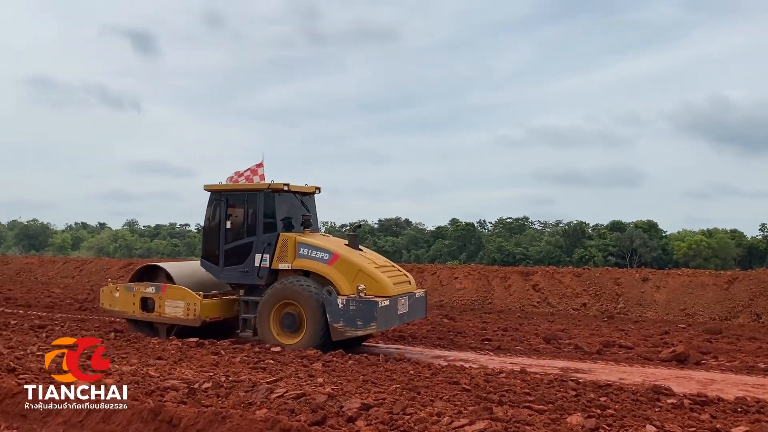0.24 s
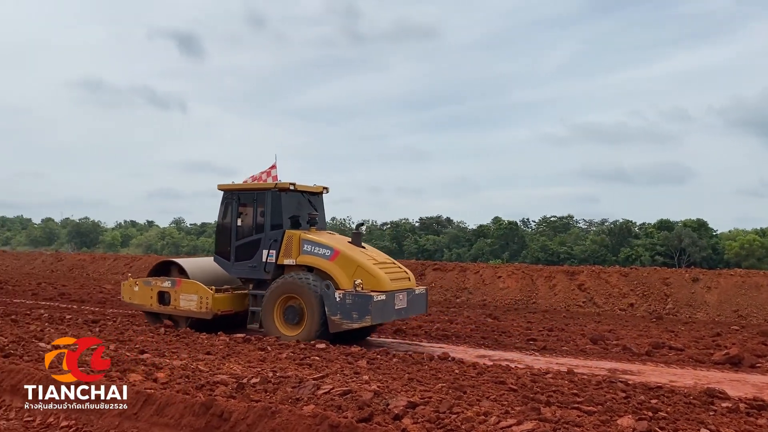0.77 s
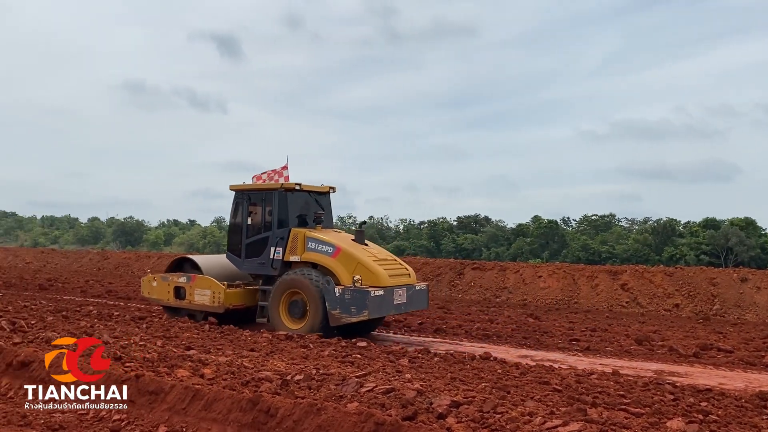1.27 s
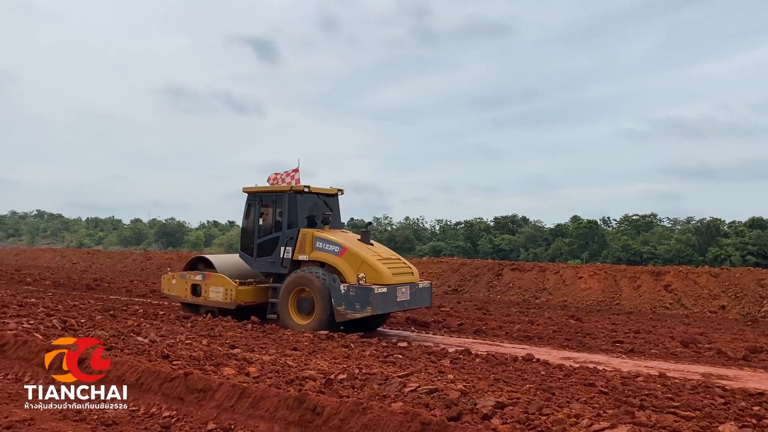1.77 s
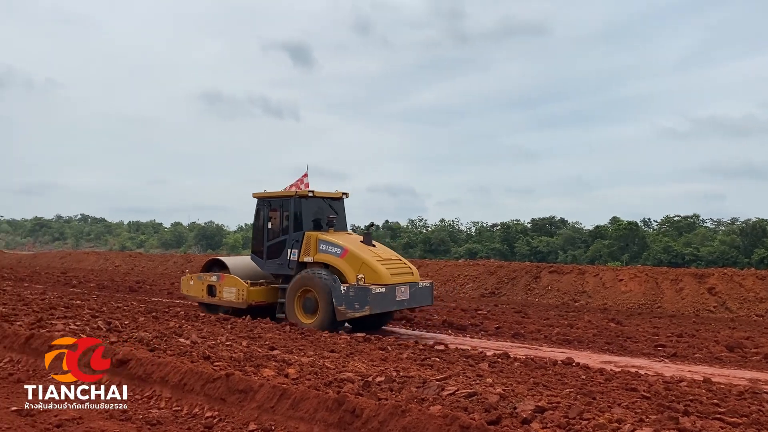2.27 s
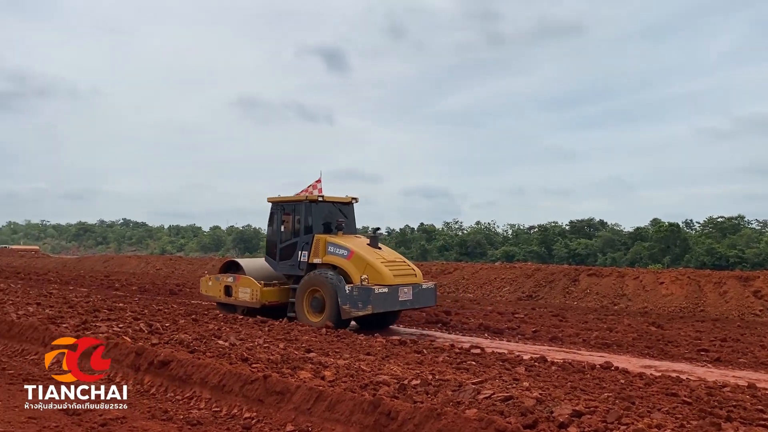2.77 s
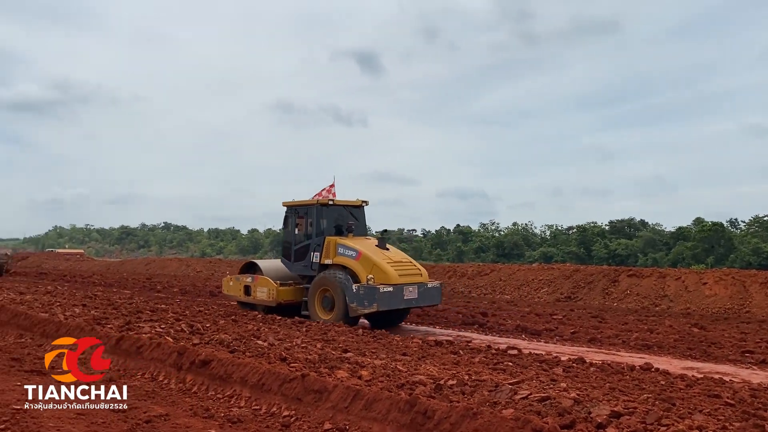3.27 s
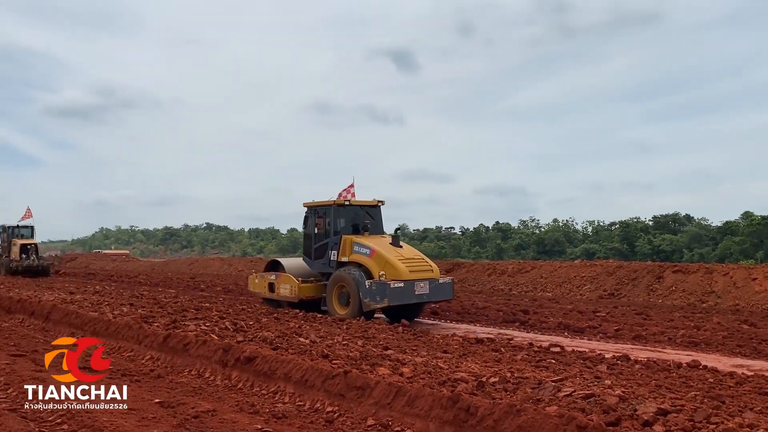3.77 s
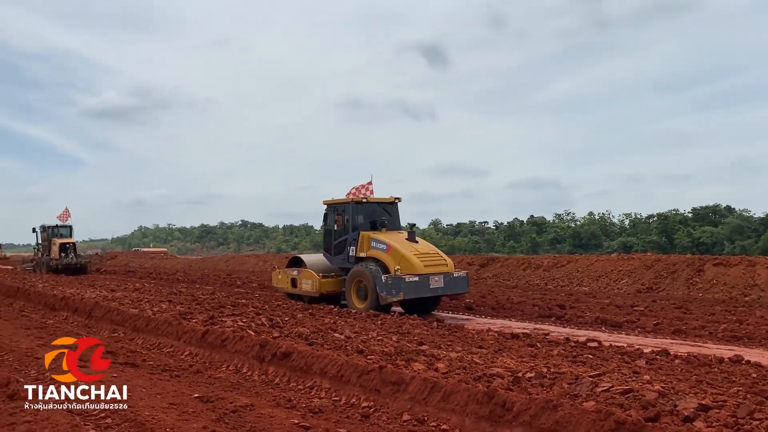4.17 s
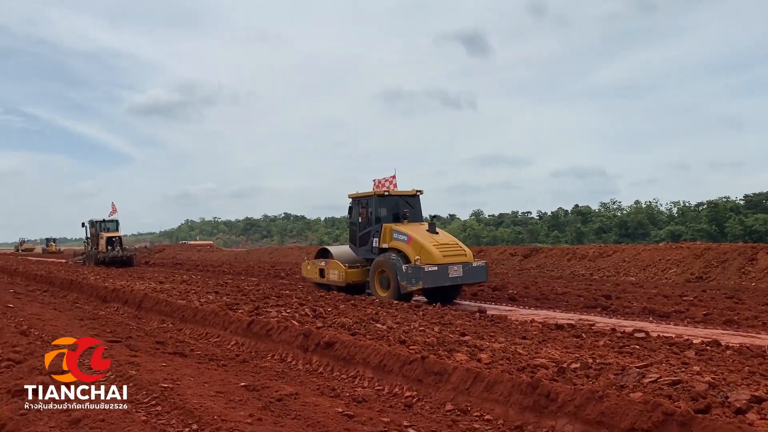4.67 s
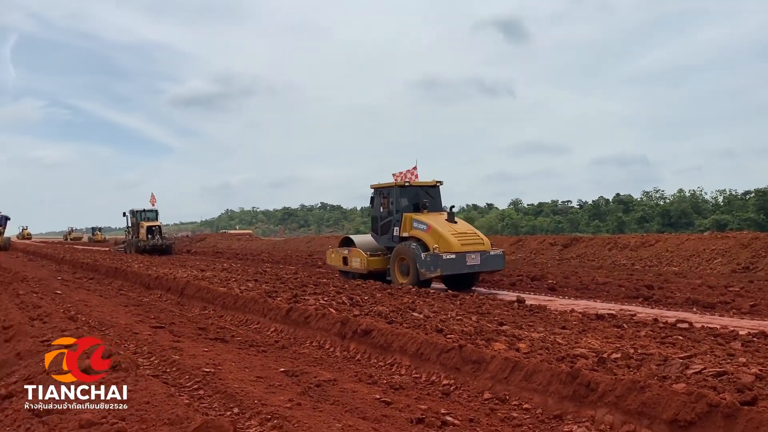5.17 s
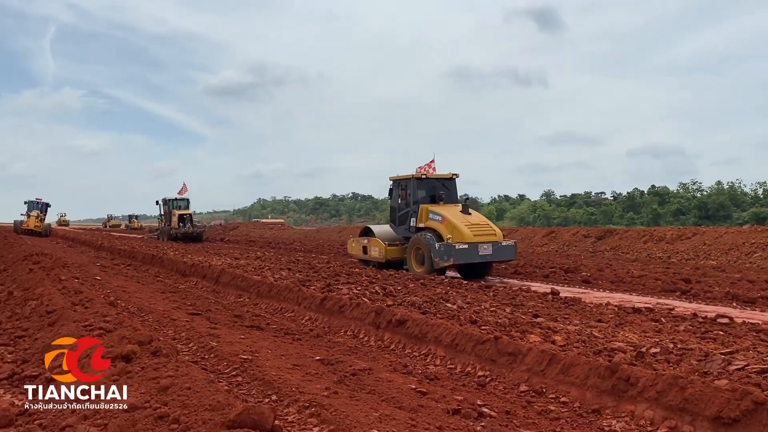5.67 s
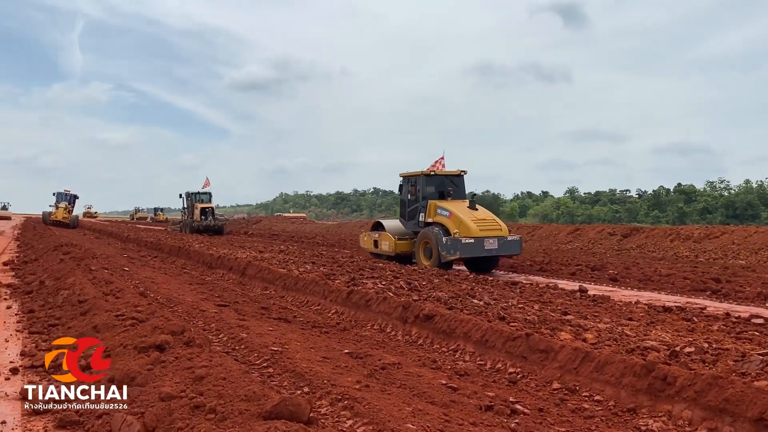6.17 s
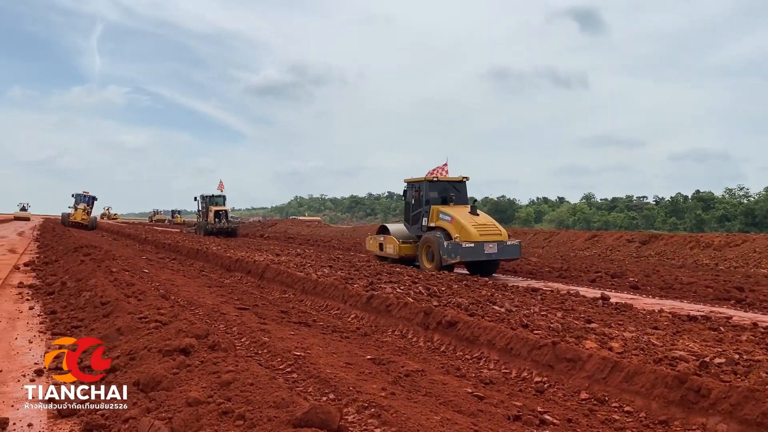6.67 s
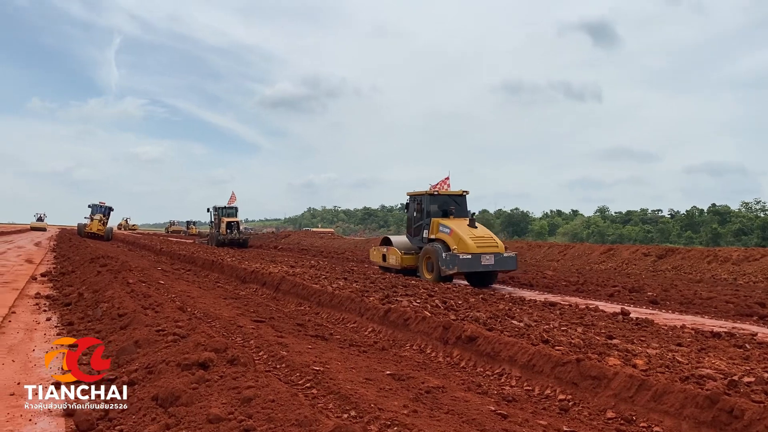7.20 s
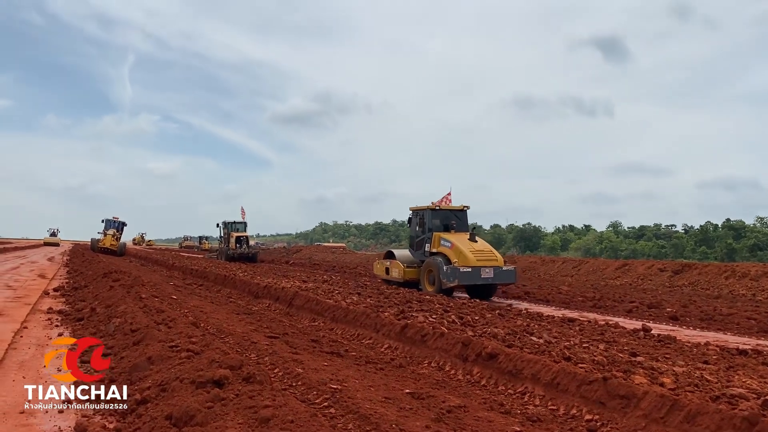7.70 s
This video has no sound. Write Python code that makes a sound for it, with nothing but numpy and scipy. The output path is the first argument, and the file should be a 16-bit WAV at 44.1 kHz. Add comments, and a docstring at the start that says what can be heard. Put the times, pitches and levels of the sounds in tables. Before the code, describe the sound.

A soil compactor works nearby on an open construction site, its diesel throbbing with fan roar, hiss, hydraulic whine and a deep vibrating drum. It slowly rolls away and the whine fades, while other engines drone farther off. A few brief clatters come early, then faint squeaks and a thin rattle of loose metal. Wind buffets the small stereo microphone throughout with low gusts and thumps.

```python
"""A soil compactor's diesel throbs about 14 m off, with fan roar, hydraulic whine and a vibrating drum.
It rolls away over loose fill while wind buffets the two ports of a small stereo microphone.
Farther across the site two engines drone and a second drum draws near. Brief clatters come through,
then the squeaks of a rubbing joint and the rattle of loose metal.
Sources that return a pair give (mid, side): what the ports share, and their difference."""
import sys
import numpy as np
from scipy import signal
from scipy.fft import rfft, irfft, next_fast_len
from scipy.io import wavfile
from scipy.ndimage import uniform_filter1d

SR = 44100
rng = np.random.default_rng(int(sys.argv[2]) if len(sys.argv) > 2 else 0)


def log_audio(samples):
    """Write samples as a 16-bit WAV file to the path given in sys.argv[1]."""
    # one column per channel
    frames = np.atleast_2d(samples).T
    # limit to full scale, then quantise
    limited = np.clip(frames, -1, 1)
    pcm = np.round(limited * 32767).astype(np.int16)
    wavfile.write(sys.argv[1], SR, pcm)


N = 350154
T = np.arange(N) / SR
FIRINGS_PER_S = 65.12
STAGES_S = [1.3, 4, 6.6]  # early, midway and late in the compactor's turn
START_M, SPEED_M_PER_S, ABEAM_S = 14.07, 3.38, 0.21  # its nearest distance, its pace, when it is nearest


def amp(db):
    return np.exp(np.asarray(db) * np.log(10) / 20)


def unit_rms(x):
    return x / np.sqrt(np.mean(abs(x) ** 2) + 1e-20)


def curves(rows):
    """Every column of a timed table at each sample."""
    times, *columns = np.transpose(rows)
    return [np.interp(T, times, column) for column in columns]


def at_hz(points, hz):
    """A table's value along a logarithmic frequency axis."""
    freqs, values = np.transpose(points)
    return np.interp(np.log(hz + 1), np.log(freqs + 1), values)


def drift(hz):
    """Random wander of rms 1, up to the rate hz."""
    lowpass = signal.butter(2, hz, fs=1000, output="sos")
    coarse = signal.sosfilt(lowpass, rng.standard_normal(10000))[1000:]
    return unit_rms(np.interp(T * 1000, np.arange(9000), coarse))


def tone(hz, db, multiple=1):
    """A sine that follows a pitch and an rms level."""
    turns = multiple * np.cumsum(hz * np.ones(N)) / SR + rng.random()
    return np.sqrt(2) * amp(db) * np.cos(2 * np.pi * (turns % 1).astype(np.float32))


def patchy_spectra(patchy_db, size=1024):
    """Random short-time spectra with louder and softer patches, and their frequencies."""
    real, imag, patches = rng.standard_normal((3, size // 2 + 1, N // (size // 4) + 5), dtype=np.float32)
    patches = unit_rms(uniform_filter1d(uniform_filter1d(patches, size=10, axis=0), size=12, axis=1))
    return (real + 1j * imag) * amp(patchy_db * patches), np.fft.rfftfreq(size, 1 / SR)


def coloured(spectra, hz, colour, later=None):
    """Noise of rms 1 from the spectra; its colour blends into the later one, if given."""
    size, blend = 2 * len(hz) - 2, np.linspace(0, 1, spectra.shape[1])
    colour_db = np.outer(at_hz(colour, hz), 1 - blend) + np.outer(at_hz(later or colour, hz), blend)
    return unit_rms(signal.istft(spectra * amp(colour_db), nperseg=size, noverlap=size * 3 // 4)[1][:N])


def resonate(x, hz, width_hz):
    """A resonance at a fixed or moving pitch: shift it to zero, smooth twice, shift back."""
    carrier = np.exp(2j * np.pi * np.cumsum(hz * np.ones(len(x))) / SR)
    pole = np.exp(-np.pi * width_hz / SR)
    smoothed = signal.lfilter([1], [1, -2 * pole, pole * pole], x * carrier.conj())
    return unit_rms((carrier * smoothed).real)


def distance():
    """The compactor's metres beyond its nearest point, and the spreading loss in dB."""
    gone_m = np.hypot(START_M, SPEED_M_PER_S * (T - ABEAM_S)) - START_M
    return gone_m, 20 * np.log10(1 + gone_m / START_M)


# Difference between the microphone's ports: (frequency [Hz], side re mid [dB])
LAG_LEVEL = [(30, -30), (60, -22), (120, -20), (330, -15), (430, -17.5), (560, -13), (800, -17.5),
             (1050, -20), (1300, -39), (1480, -42), (1700, -90)]
# Phase of that difference: (frequency [Hz], phase [turns])
LAG_PHASE = [(300, -0.26), (500, -0.23), (750, -0.2), (1100, -0.13)]
def port_lag(mid):
    """The side signal left by low sound reaching one port late."""
    size = next_fast_len(N)
    hz = np.fft.rfftfreq(size, 1 / SR)
    response = amp(at_hz(LAG_LEVEL, hz)) * np.exp(2j * np.pi * at_hz(LAG_PHASE, hz))
    return irfft(rfft(mid, size) * response, size)[:N]


# The firing note at the microphone, weaker at first: (time [s], level change [dB])
EXHAUST_TRIM = [(1, -2), (2.5, -2.5), (4.5, 1)]
# Overtones as the machine turns its back: (multiple, early level [dB], midway [dB], late [dB])
FIRING_ORDERS = [(2, -28, -31, -34), (3, -37, -37, -43), (7, -48, -40, -45), (8, -47, -55, -51),
                 (9, -46, -46, -49), (12, -52, -57, -51), (13, -45.5, -50, -65), (14, -58, -51, -52),
                 (18, -48, -48, -49), (20, -51, -48, -51), (20.5, -60, -52, -52), (23, -60, -52, -59),
                 (31.5, -52, -54, -66)]
def exhaust(level_db=-21.5):
    """The diesel's firings make a low note and a row of overtones."""
    out = tone(FIRINGS_PER_S, level_db + curves(EXHAUST_TRIM)[0] + 1.1 * drift(2.4))
    for multiple, *levels in FIRING_ORDERS:
        out += tone(FIRINGS_PER_S, np.interp(T, STAGES_S, levels) + 1.5 * drift(0.8), multiple)
    return out


# Fan roar with the machine side-on to the microphone: (frequency [Hz], relative density [dB])
ROAR_SIDE_ON = [(190, -63), (330, 5), (378, -14.5), (429, -1.5), (483, -5), (829, -4.5), (941, -9),
                (1430, -8.5), (1590, -9.5), (2200, -23.5), (2860, -56), (4840, -120)]
# The roar from behind, farther off: (frequency [Hz], relative density [dB])
ROAR_REAR = [(190, -9), (330, -6.5), (443, -1), (531, -8), (796, -7), (956, -5), (1300, -3.5), (1480, -13),
             (1690, -8.5), (2200, -13), (2860, -13), (4840, -120)]
# Pulsing within an engine cycle of four firings: (beats [per cycle], depth [0-1], phase [turns])
CYCLE_BEATS = [(1, .03, .1), (2, .045, -.3), (4, .05, .15), (5, .035, .1), (8, .02, .15)]
def fan_roar(nearest_db=-25.5):
    """Rushing air pulses with the unevenly firing cylinders and fades with distance."""
    _, loss_db = distance()
    cycles = FIRINGS_PER_S * T / 4
    pulse = 1 + sum(depth * np.cos(2 * np.pi * (k * cycles + phase)) for k, depth, phase in CYCLE_BEATS)
    roar = amp(nearest_db - loss_db) * pulse * coloured(*patchy_spectra(0.78), ROAR_SIDE_ON, ROAR_REAR)
    return roar, port_lag(roar)


# Engine hiss in the mid channel, machine side-on: (frequency [Hz], relative density [dB])
HISS_SIDE_ON = [(880, -27), (1500, -7.5), (1740, -6), (2170, -6), (2990, -4.5), (3830, -10.5),
                (4400, -10.5), (4890, -19.5), (5290, -15), (5820, -15), (7310, -19.5), (10900, -25.5),
                (11600, -29), (12300, -62), (12500, -100)]
# The hiss from behind, farther off: (frequency [Hz], relative density [dB])
HISS_REAR = [(880, -15.5), (1500, -1), (2170, -7.5), (3000, -10), (4300, -9.5), (4850, -16.5), (5300, -9),
             (5900, -13.5), (7500, -18), (10900, -22.5), (11600, -35.5), (12300, -54), (12500, -100)]
# The hiss in the difference of the ports: (frequency [Hz], relative density [dB])
HISS_WIDE = [(1500, -59), (1900, -89), (2120, -3), (2360, 2), (3000, 0), (3590, -7), (4070, -3), (4750, 2),
             (5380, -8.5), (6790, -7.5), (10400, -6.5), (12200, -11), (15800, -11)]
# How closely that difference is tied to the mid: (frequency [Hz], share [0-1])
HISS_COHERENCE = [(2000, .66), (3000, .75), (3900, .58), (4700, .36), (6500, 0.68), (9500, .68)]
def engine_hiss(mid_db=-30.5, side_db=-38.5, extra_loss_db_per_m=0.03):
    """Hiss swells at each firing, fades faster than the roar and reaches the ports a little apart."""
    gone_m, loss_db = distance()
    fade_db = -loss_db - extra_loss_db_per_m * gone_m
    side_fade_db = 0.62 * (fade_db - fade_db.mean())  # the side follows only part of the fading
    firing_phase = 2 * np.pi * FIRINGS_PER_S * T
    throb = amp(.5 * drift(12)) * (1 + .065 * np.cos(firing_phase) + .025 * np.cos(firing_phase / 4))
    spectra, hz = patchy_spectra(0.72)
    tied = at_hz(HISS_COHERENCE, hz)[:, None]
    # a delay between the ports turns the phase a quarter
    apart = 1j * tied * spectra + np.sqrt(1 - tied ** 2) * patchy_spectra(.9)[0]
    mid = amp(mid_db + fade_db) * coloured(spectra, hz, HISS_SIDE_ON, HISS_REAR)
    side = amp(side_db + side_fade_db) * coloured(apart, hz, HISS_WIDE)
    return throb * mid, throb * side


# Background of the whole site: (frequency [Hz], relative density [dB])
SITE_SPECTRUM = [(20, -23), (40, -1), (64, 8), (85, 4), (115, 0), (160, -9.5), (250, -13.5), (400, -19),
                 (600, -68)]
def site_rumble(level_db=-25.5):
    """A steady low rumble lies under the machines."""
    return amp(level_db) * coloured(*patchy_spectra(0.22, size=8192), SITE_SPECTRUM)


# The pump, which the bonnet hides from the microphone as the machine turns: (time [s], level [dB])
PUMP_LEVEL = [(0, -28.5), (1.3, -28), (2.6, -30), (3.3, -32), (3.8, -34.5), (4.6, -40), (5.3, -38),
              (6.6, -47), (7.94, -44)]
def pump(piston_hz=428.7):
    """The hydraulic pump's pistons whine, with a wavering octave above."""
    hz, db = piston_hz + 1.124 * drift(0.786), curves(PUMP_LEVEL)[0]
    whine = tone(hz, db + (.3 + 0.24 * T) * drift(1.0))
    octave = tone(2 * (hz + 4 * drift(8.97)), 0.62 * db - 32 + 3.5 * drift(2.7))
    return whine + octave, port_lag(whine + octave)


# The bonnet as it moves off: (frequency [Hz], width [Hz], early level [dB], midway [dB], late [dB])
PANEL_MODES = [(627, 19, -43, -52, -51), (715.3, 35, -37, -44, -45), (773, 80, -37, -45, -70),
               (850, 79, -39.5, -39.5, -47), (1312, 54, -56, -37.5, -46.5), (1640, 63, -43.5, -58, -69)]
def panels():
    """Bonnet panels sing, shaken by engine noise."""
    shaking, out = rng.standard_normal(N), np.zeros(N)
    for hz, width_hz, *levels in PANEL_MODES:
        mode = signal.iirpeak(hz, hz / width_hz, SR)
        ring = unit_rms(signal.lfilter(*mode, signal.lfilter(*mode, shaking)))
        out += amp(np.interp(T, STAGES_S, levels)) * ring
    return out, port_lag(out)


# The compactor's own drum, weaker over soft ground: (time [s], level [dB])
NEAR_DRUM_LEVEL = [(0, -18.5), (2.9, -21), (3.3, -22), (4.3, -21), (4.7, -20.5), (7.3, -24.5), (7.94, -27)]
# Its tones: (multiple of the shaft rate, level re the second multiple [dB])
NEAR_DRUM_ORDERS = [(1, -14), (2, 0)]
# A second drum drawing near from across the site: (time [s], level [dB])
FAR_DRUM_LEVEL = [(1.3, -34), (2.7, -24), (5.2, -21), (6.6, -21.5), (7.94, -26.5)]
# Its overtones: (multiple of the shaft rate, level re the second multiple [dB])
FAR_DRUM_ORDERS = [(2, 0), (3, -9)]
def drums(near_hz=26.1, far_hz=31.05):
    """Eccentric shafts shake the drums; the ground doubles the beat."""
    near_db, far_db = curves(NEAR_DRUM_LEVEL)[0], curves(FAR_DRUM_LEVEL)[0]
    near = sum(tone(near_hz, near_db + db + 1.3 * drift(7.1), k) for k, db in NEAR_DRUM_ORDERS)
    far = sum(tone(far_hz, far_db + db + drift(0.55), k) for k, db in FAR_DRUM_ORDERS)
    far_shaft = tone(far_hz, db=-31)
    return near + far + far_shaft


# Two engines far across the site, a list for each: (time [s], pitch [Hz], level [dB])
FAR_ENGINES = [
    [(0, 73.5, -23.5), (1.2, 74, -27), (3, 73, -24.5), (5, 73.7, -31), (7.94, 74, -25)],
    [(0, 97, -25), (1.5, 95.5, -28), (2.2, 96, -21), (3, 95.5, -23), (3.8, 90, -27), (4.2, 92, -32),
     (4.7, 97, -21), (6.5, 94, -35), (7.94, 94.5, -29)],
]
def drones(octave_db=-11.5):
    """Exhaust notes of far engines; pitch and level waver with the load."""
    out = np.zeros(N)
    for engine in FAR_ENGINES:
        hz, db = curves(engine)
        hz, db = hz + 0.618 * drift(2.43), db + 3.0 * drift(2.6)
        out += tone(hz, db) + tone(2 * hz, db + octave_db)
    return out


# Wind right at the microphone: (time [s], mid level [dB], side level [dB])
WIND_LEVELS = [(0, -34.5, -31), (.36, -18.5, -38), (.7, -28, -34), (1.05, -17.5, -43), (1.55, -21, -37),
               (1.85, -16.5, -37), (2.2, -23, -32), (2.64, -17.5, -33), (3.1, -18, -34), (3.45, -20.5, -34),
               (3.72, -22.5, -31), (4.1, -16, -36), (4.56, -21.5, -34), (4.7, -24.5, -40), (5, -28, -37),
               (5.28, -24, -56), (5.5, -25, -57), (5.78, -24.5, -42), (5.98, -24, -48), (6.6, -24, -33),
               (6.8, -21.5, -33), (7.2, -26.5, -35), (7.32, -22.5, -33), (7.5, -27, -35), (7.68, -17, -38),
               (7.8, -23.5, -39), (7.94, -23, -36)]
# Gusts on both ports alike: (frequency [Hz], relative density [dB])
GUST_SPECTRUM = [(20, -28), (38, -11), (50, -5), (81, 2.5), (180, -7.5), (394, -21), (546, -26), (867, -37),
                 (1500, -93)]
# Eddies that differ between the ports: (frequency [Hz], relative density [dB])
EDDY_SPECTRUM = [(20, -28), (45, 0), (80, 10), (200, -0.5), (424, -10), (826, -19.5), (1300, -50),
                 (1520, -67), (1700, -80)]
def wind():
    """Air buffets the ports with lumpy low noise."""
    gust_db, eddy_db = curves(WIND_LEVELS)
    gusts = coloured(*patchy_spectra(0.6, size=4096), GUST_SPECTRUM) * amp(gust_db + 3.0 * drift(22))
    eddies = coloured(*patchy_spectra(0.67, size=4096), EDDY_SPECTRUM) * amp(eddy_db + 3.0 * drift(26))
    return gusts, eddies + port_lag(gusts)


# Flurries across the microphone: (start [s], length [s], level [dB])
FLURRY_EVENTS = [(0.025, 0.15, -30.5), (5.63, 0.04, -33), (5.694, 0.028, -31), (5.765, 0.09, -26),
                 (7.137, 0.027, -27), (7.263, .015, -29), (7.28, 0.049, -23), (7.33, 0.076, -21),
                 (7.539, 0.034, -27), (7.6, .02, -28), (7.646, 0.053, -23), (7.855, 0.032, -23),
                 (7.915, .025, -25)]
# Their colour: (frequency [Hz], relative density [dB])
FLURRY_SPECTRUM = [(20, -25), (60, -3), (130, -2), (300, -8), (600, -14), (1000, -24), (1350, -32),
                   (1550, -70)]
def flurries(edge_s=.006):
    """Abrupt, brighter wind flutters on the two ports in opposition."""
    gate = sum(amp(db) * np.clip(np.minimum(T - start, start + length - T) / edge_s + .5, 0, 1)
               for start, length, db in FLURRY_EVENTS)
    return gate * coloured(*patchy_spectra(0.6), FLURRY_SPECTRUM) * amp(4.6 * drift(60))


# Puffs on the microphone's membrane: (time [s], peak level [dB], pitch [Hz])
PUFF_EVENTS = [(0.352, -7, 199), (1.063, -5.5, 193), (1.447, -7.5, 231), (1.78, -14, 85), (1.787, -10, 191),
               (1.868, -12, 80), (1.965, -12, 277), (2.014, -6.5, 191), (2.227, -10, 254), (2.23, -15, 99),
               (2.293, -6, 200), (2.586, -8, 215), (2.624, -3, 340), (2.633, -7.5, 130), (2.776, -7, 130),
               (2.851, -3.5, 85), (2.867, -4.5, 160), (2.971, -4, 110), (3.019, -7, 194), (3.061, -12, 110),
               (3.078, -2, 95), (3.1, -9, 280), (3.211, -3, 179), (3.269, -4, 220), (3.332, -13, 320),
               (3.543, -10, 207), (3.825, -12, 246), (3.908, -12, 191), (3.989, -9, 150), (4.104, -16, 120),
               (4.127, -4.5, 194), (4.149, -8, 258), (4.388, -5, 120), (4.451, -4.5, 206), (4.549, -4, 179),
               (7.294, -22, 450), (7.3, -4.5, 162), (7.4, -16, 168), (7.467, -4.5, 227), (7.478, -18, 230),
               (7.655, -18, 298), (7.694, -16, 500), (7.688, -12, 289), (7.728, -11, 189)]
def puffs(cycles=1.44, pitch_fall=0.84):
    """Each puff of wind pushes the membrane in one short thump of falling pitch."""
    out = np.zeros(N)
    for time, db, hz in PUFF_EVENTS:
        span = slice(round((time - .03) * SR), round((time + .05) * SR))
        offset = (T[span] - time) * hz / cycles - .5  # from the peak, in puff lengths
        turns = cycles * offset * (1 - pitch_fall * np.clip(offset, -1, 1))
        out[span] += amp(db) * np.exp(-7 * offset ** 2) * np.cos(2 * np.pi * turns)
    return out, port_lag(out)


# Clatter from the compactor, still close by: (time [s], level [dB])
CLATTER_EVENTS = [(.95, -37), (1.08, -35), (1.23, -30), (2.48, -34), (3.42, -35), (3.67, -41)]
def clatter(width_s=0.013):
    """Short bursts of bright noise beat with the firing."""
    bursts = sum(amp(db) * np.exp(-((T - time) / width_s) ** 2) for time, db in CLATTER_EVENTS)
    beat = 1 + .4 * np.cos(2 * np.pi * FIRINGS_PER_S * T)
    return bursts * beat * resonate(rng.standard_normal(N), hz=2300, width_hz=2300)


def tail_hiss(peak_s=3.5, width_s=.6, level_db=-47):
    """A high hiss swells briefly as the tail of the machine swings round."""
    swell = amp(level_db + 1.3 * drift(6)) * np.exp(-((T - peak_s) / width_s) ** 2)
    return swell * resonate(rng.standard_normal(N), hz=5800, width_hz=600)


# Metal squeaking farther off on the site: (time [s], level [dB], pitch [Hz])
SQUEAK_EVENTS = [(3.415, -34, 4200), (3.872, -36, 4170), (4.578, -40, 4100), (4.65, -41, 4050),
                 (4.795, -40, 4200), (4.947, -40, 4140), (5.11, -43, 4020), (5.178, -44, 3970),
                 (5.248, -42, 4200), (5.322, -44, 3990), (5.756, -39, 4220), (6.47, -34, 3940),
                 (6.535, -35, 3950), (6.554, -37, 4340), (6.633, -42, 4320), (6.903, -46, 4340),
                 (6.973, -45, 4380), (7.125, -39, 4230), (7.39, -43, 4370), (7.58, -46, 4450),
                 (7.9, -43, 4100)]
def squeaks(width_s=.011):
    """A rubbing joint gives brief fuzzy whistles."""
    out = np.zeros(N)
    t = np.arange(-3 * width_s, 3 * width_s, 1 / SR)
    for time, db, hz in SQUEAK_EVENTS:
        whistle = resonate(rng.standard_normal(len(t)), hz, width_hz=200)
        start = round((time + t[0]) * SR)
        out[start:][:len(t)] += amp(db) * np.exp(-(t / width_s) ** 2) * whistle
    return out


# A distant rattle, right of centre, faint until the second half: (time [s], level [dB])
RATTLE_LEVEL = [(3.9, -56), (4.3, -56), (4.6, -47), (5.2, -55), (5.4, -41), (5.55, -38), (5.7, -40.5),
                (5.9, -40.5), (6.25, -43.5), (6.45, -37.5), (6.6, -39), (6.75, -40), (7, -39.5),
                (7.15, -37), (7.3, -39.5), (7.55, -44), (7.75, -40), (7.82, -42), (7.9, -36.5), (7.94, -44)]
# Resonances of the loose metal: (frequency [Hz], width [Hz], relative level [dB])
METAL_MODES = [(3880, 1400, 1), (4280, 460, -9), (3987, 140, 4.5), (3770, 150, -4)]
def rattle(cycles_per_s=15.4, note_hz=3976):
    """Loose metal chatters three, four and six times in each cycle of a far engine, 15.4 cycles a second; its
    pitch wavers."""
    phase = 2 * np.pi * cycles_per_s * T
    shake = 1 + 0.18 * np.cos(3 * phase) + 0.11 * np.cos(4 * phase) + 0.087 * np.cos(6 * phase)
    ring = np.zeros(N)
    for hz, width_hz, db in METAL_MODES:
        pitch = hz * (1 + 0.0019 * drift(7.8))
        ring += amp(db + 1.1 * drift(26)) * resonate(shake * rng.standard_normal(N), pitch, width_hz)
    note = shake * tone(note_hz + 22 * drift(29), -3 + 1.3 * drift(11))
    out = amp(curves(RATTLE_LEVEL)[0]) * unit_rms(ring + note)
    return out, -.3 * out


def scene():
    """The site from where the microphone stands, as left and right."""
    mid, side = np.sum([fan_roar(), engine_hiss(), pump(), panels(), wind(), puffs(), rattle()], axis=0)
    mid += exhaust() + site_rumble() + drums() + drones() + clatter() + tail_hiss() + squeaks()
    side += flurries()
    return np.array([mid + side, mid - side])


def band_limit(x, hz):
    """A steep low-pass without delay."""
    taps = signal.firwin(511, hz, window=("kaiser", 9), fs=SR)
    return signal.oaconvolve(np.pad(x, 255, "reflect"), taps, "valid")


def record(dry):
    """Loud thumps are softly limited; a low-pass ends the mid at 12.3 kHz and the side at 15.75 kHz."""
    left, right = dry / (1 + abs(dry) ** 4) ** .25
    mid = band_limit(left + right, hz=12300) / 2
    side = band_limit(left - right, hz=15750) / 2
    return np.array([mid + side, mid - side])


dry = scene()
out = record(dry)
log_audio(out)
```